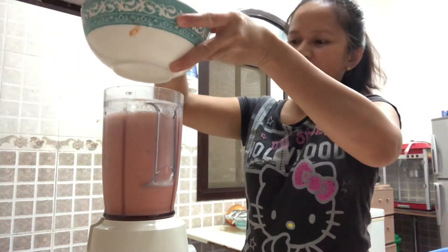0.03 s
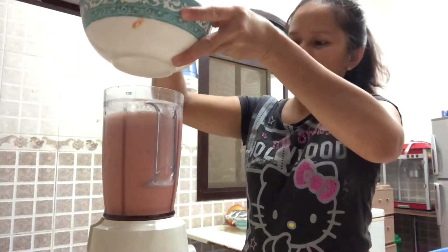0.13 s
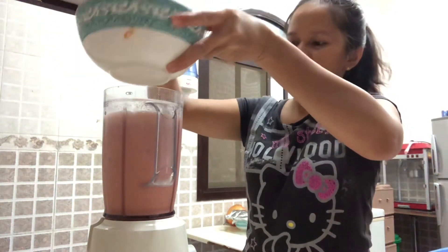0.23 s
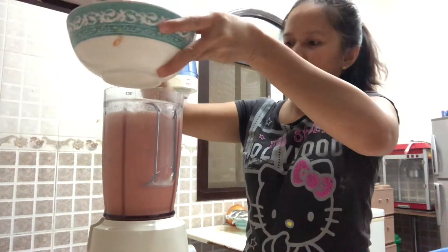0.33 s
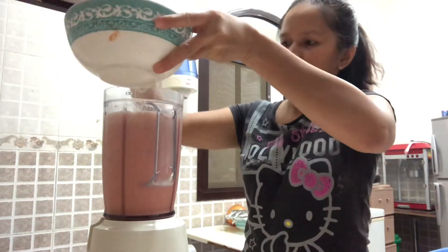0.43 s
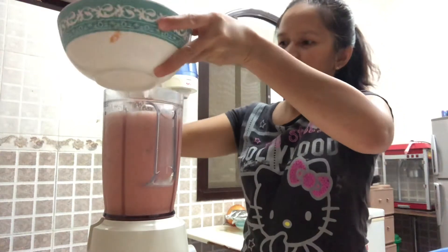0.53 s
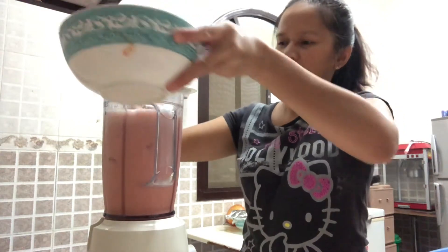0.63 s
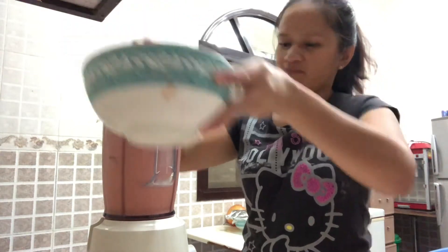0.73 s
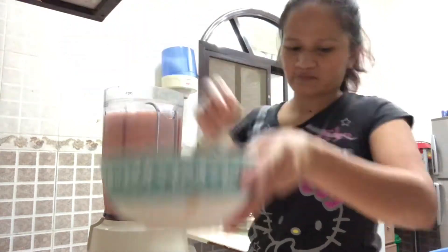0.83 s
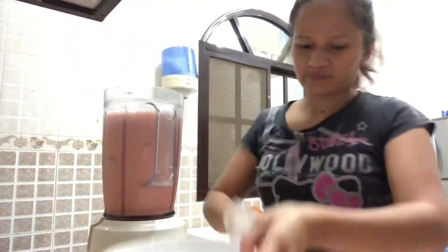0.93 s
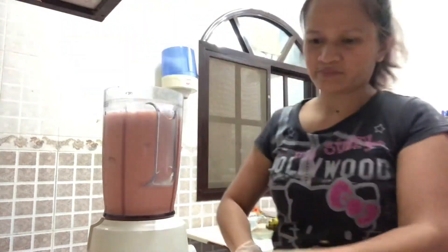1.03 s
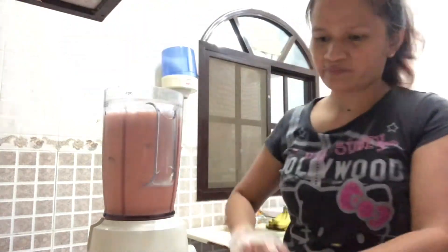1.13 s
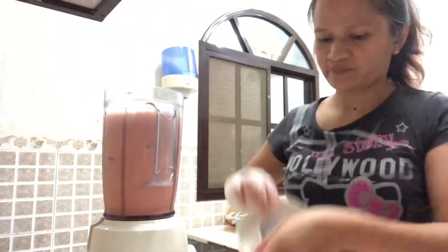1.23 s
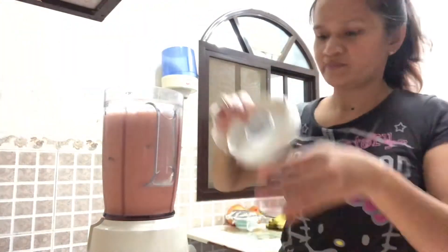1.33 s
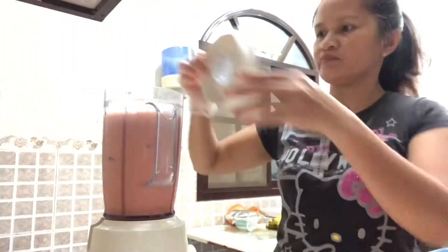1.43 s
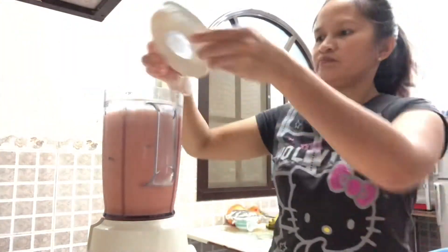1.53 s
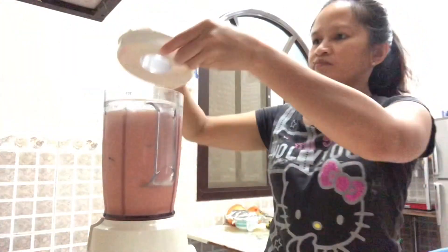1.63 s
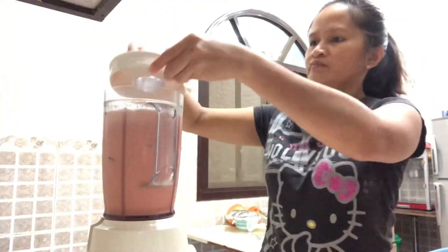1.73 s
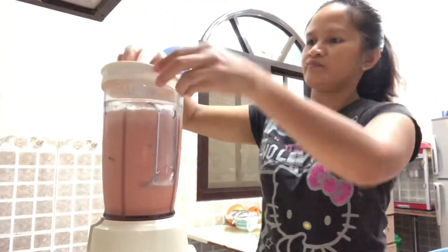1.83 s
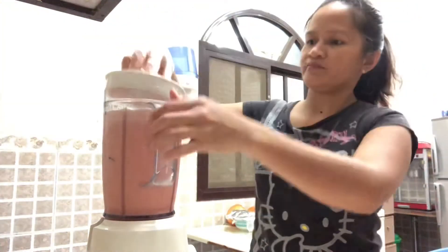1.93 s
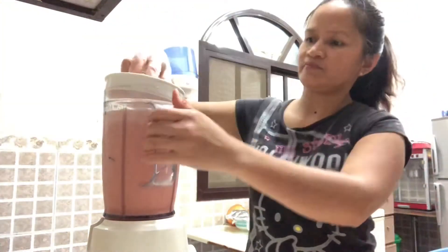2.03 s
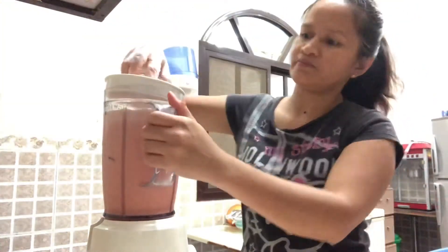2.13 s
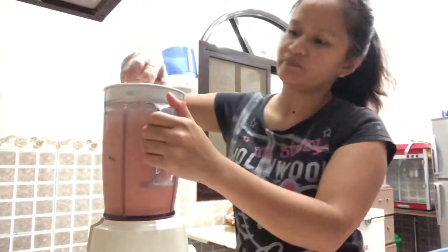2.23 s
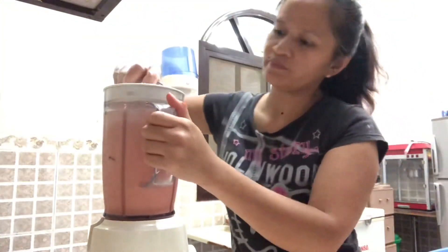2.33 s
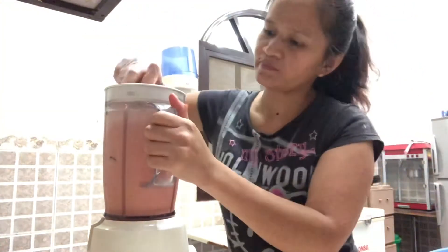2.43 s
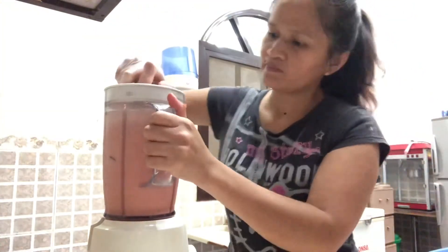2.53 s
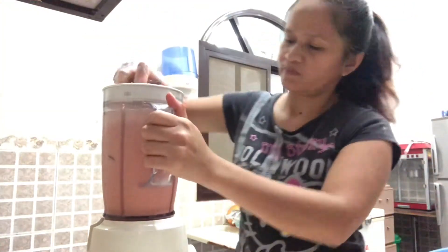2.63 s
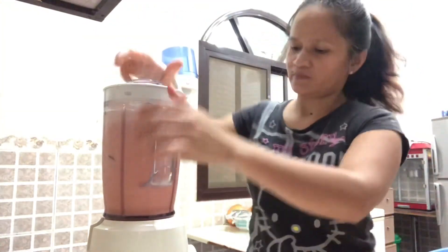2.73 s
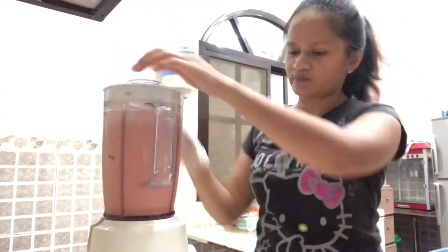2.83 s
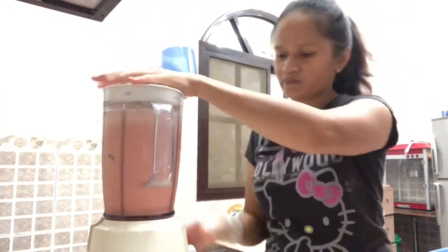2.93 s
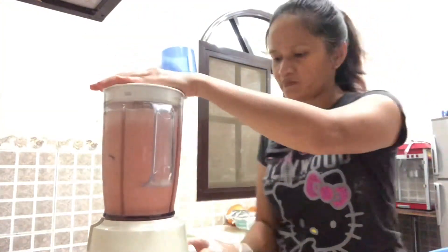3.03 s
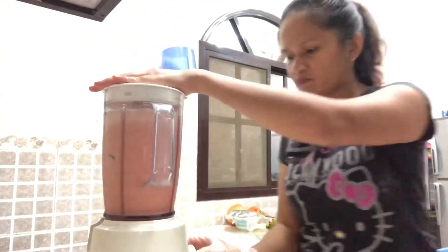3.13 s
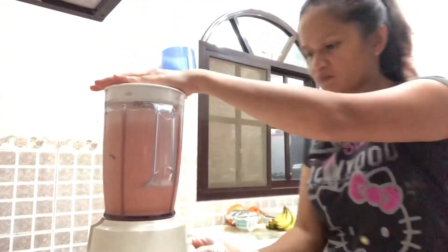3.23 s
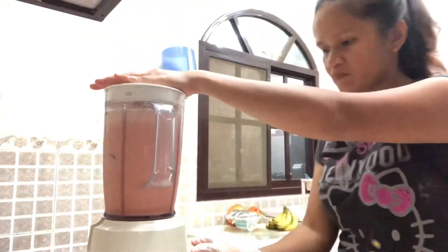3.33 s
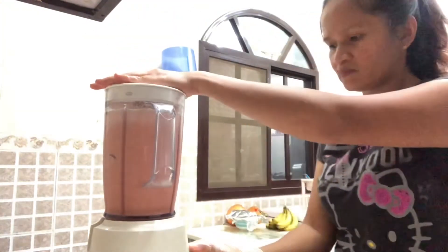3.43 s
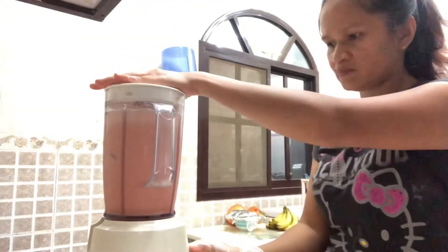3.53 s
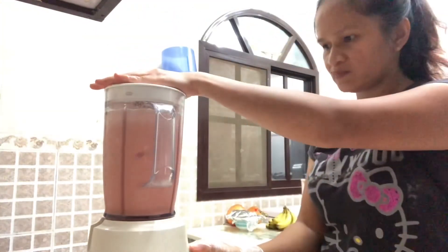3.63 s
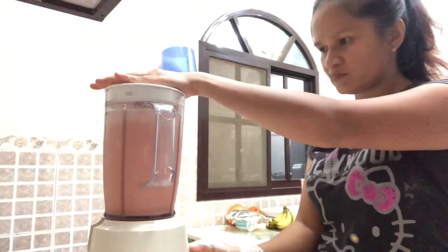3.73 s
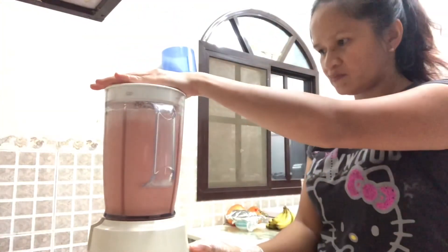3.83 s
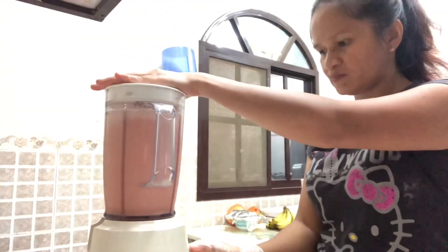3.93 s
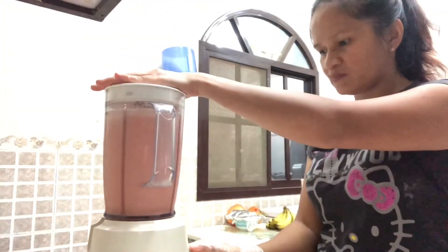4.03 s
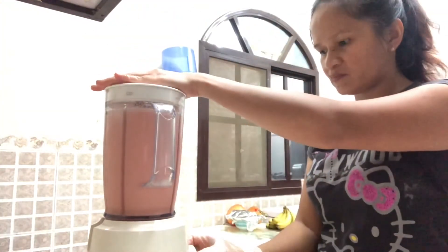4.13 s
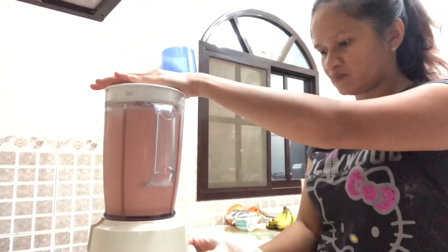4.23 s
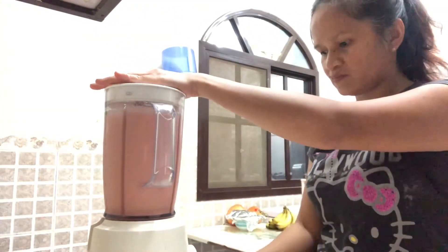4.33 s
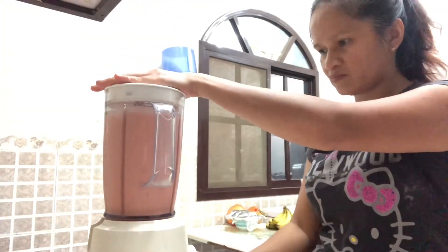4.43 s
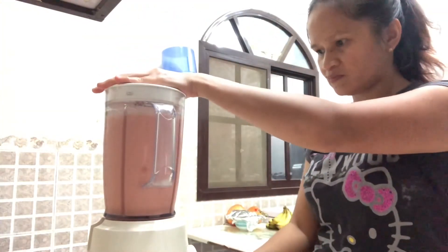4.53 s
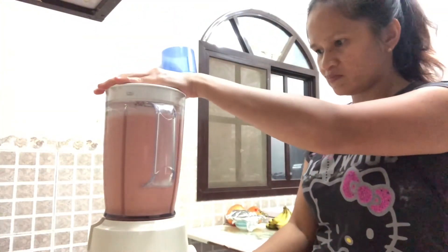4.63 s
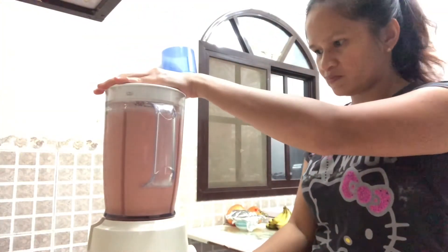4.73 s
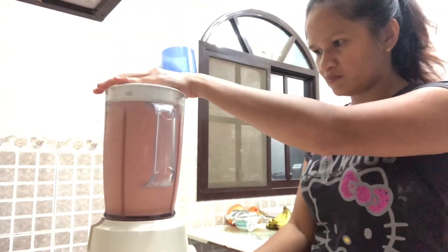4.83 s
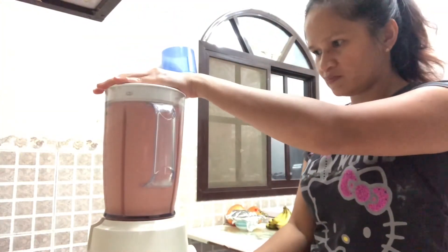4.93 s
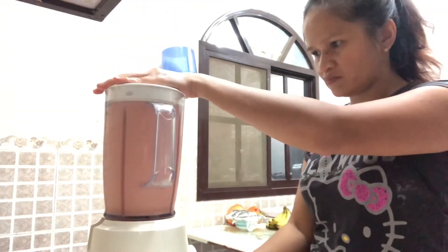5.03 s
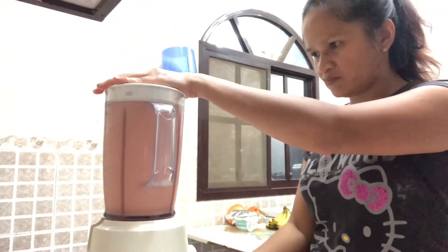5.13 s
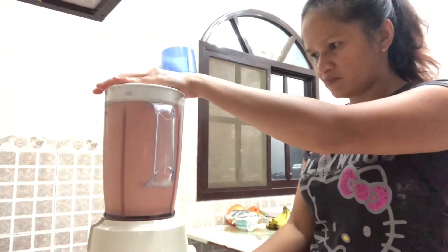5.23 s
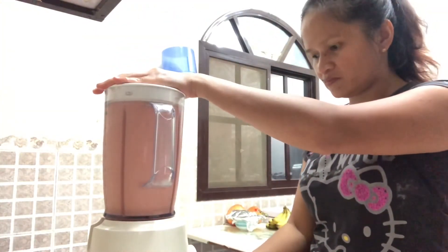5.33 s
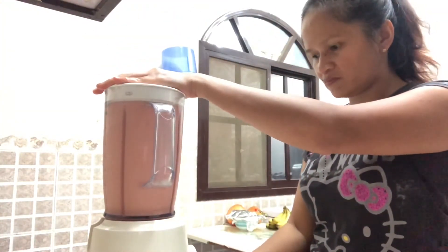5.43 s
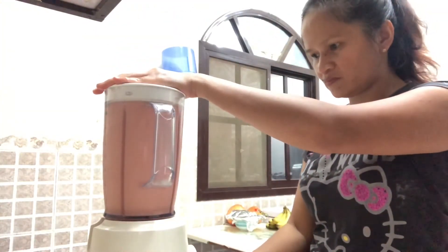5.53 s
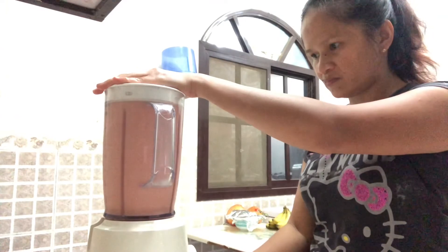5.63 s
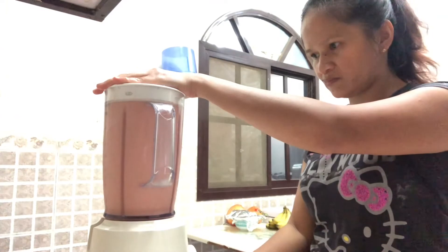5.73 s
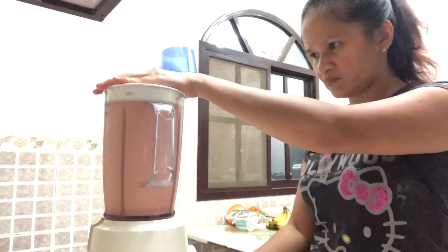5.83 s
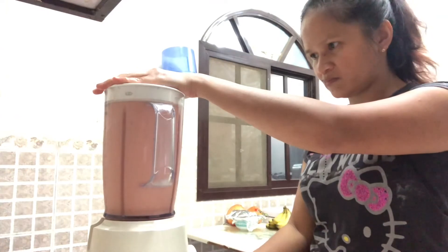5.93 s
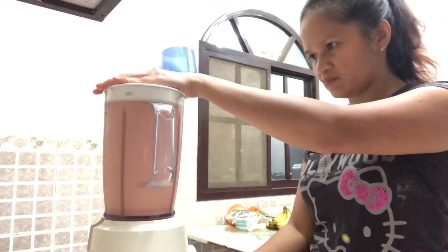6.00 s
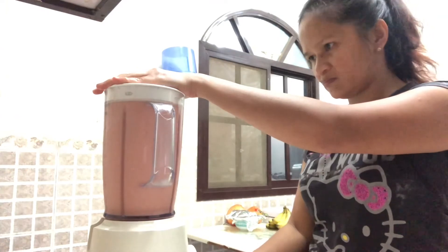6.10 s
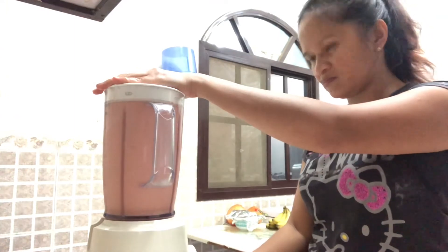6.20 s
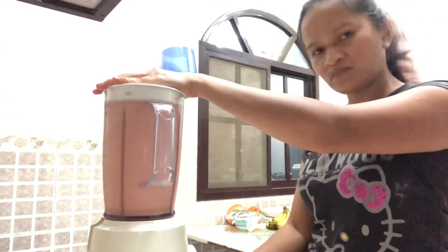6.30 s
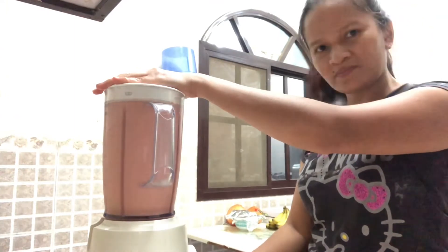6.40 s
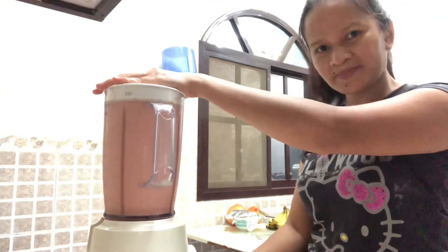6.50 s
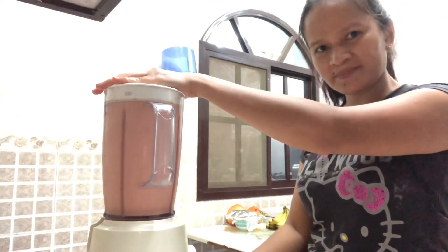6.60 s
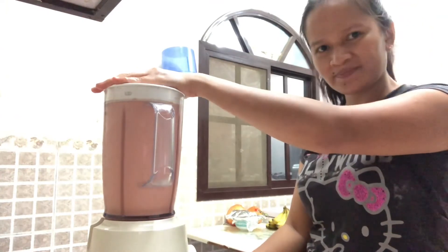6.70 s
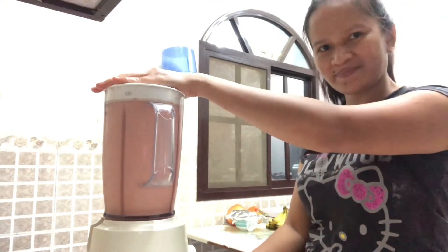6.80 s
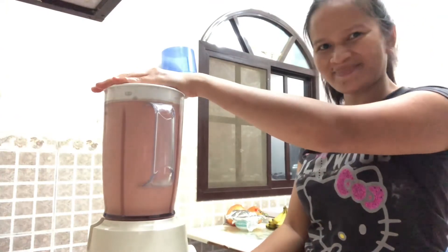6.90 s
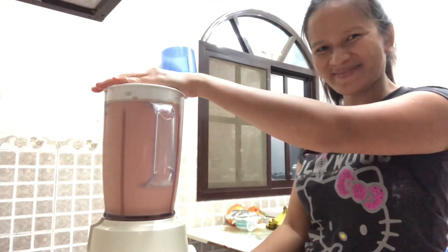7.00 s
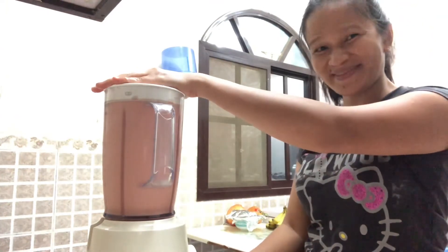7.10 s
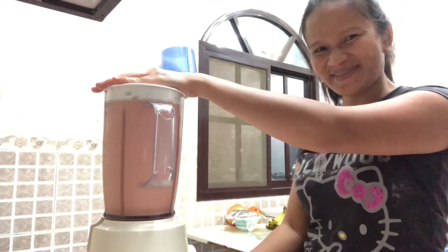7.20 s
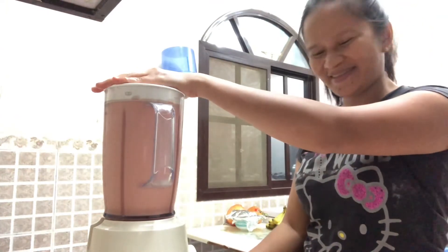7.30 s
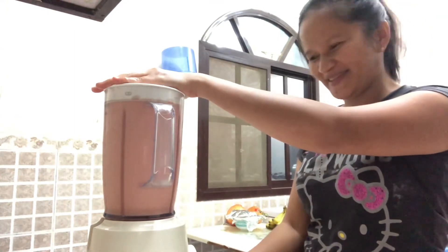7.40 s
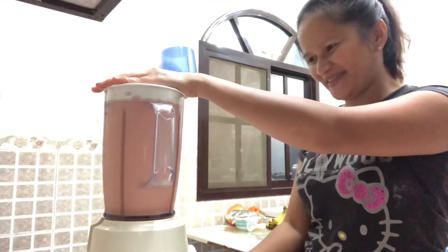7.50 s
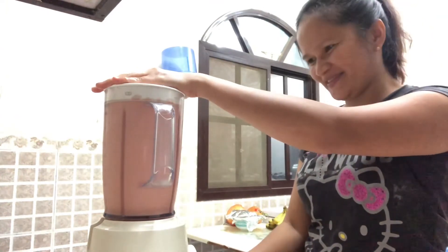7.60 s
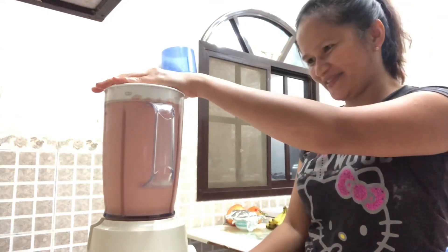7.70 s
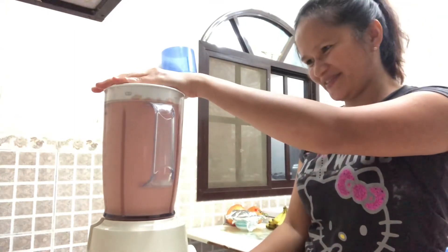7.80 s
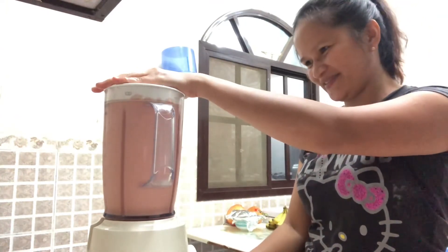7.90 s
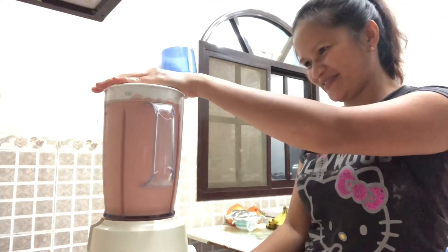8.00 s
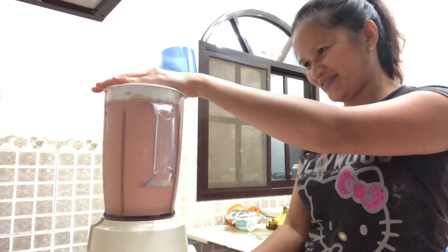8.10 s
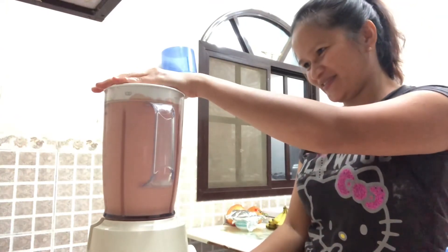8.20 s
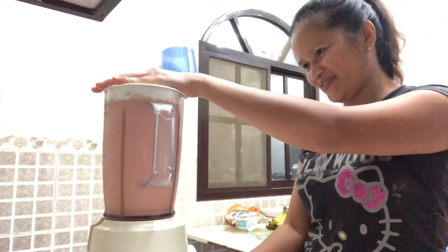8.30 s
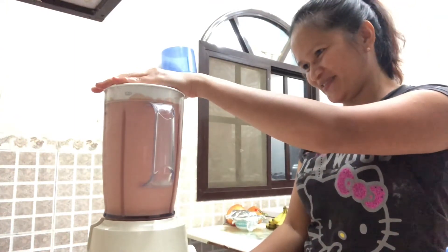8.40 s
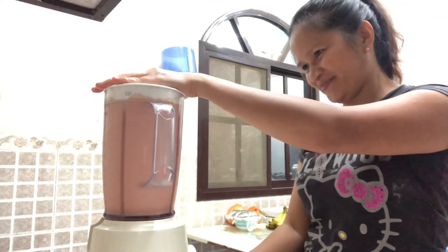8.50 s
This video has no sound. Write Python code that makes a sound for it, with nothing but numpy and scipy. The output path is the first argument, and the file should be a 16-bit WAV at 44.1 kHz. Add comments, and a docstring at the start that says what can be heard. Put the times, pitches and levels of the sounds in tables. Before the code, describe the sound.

Ice slides into a jar, a bowl clatters and a lid snaps on, then a blender starts, pauses and crushes ice with a whine.

```python
"""A blender crushes ice in a tiled kitchen: its shaft radiates a harmonic whine while chips excite the jar.
First the last ice slides from a bowl into the jar, the bowl is put down and the lid snaps shut; each
impact rings the modes of the struck body. The motor starts against wedged ice, coasts and restarts;
as the cubes break up, the load falls and the whine rises through the slush. The scene is in mono,
over the hum of the room."""
import sys
import numpy as np
from scipy import signal
from scipy.fft import rfft, irfft, next_fast_len
from scipy.io import wavfile
from scipy.ndimage import map_coordinates

SR = 44100
rng = np.random.default_rng(int(sys.argv[2]) if len(sys.argv) > 2 else 0)


def bounce(signal):
    """Save signal as a 16-bit WAV file at the path given by the first command-line argument."""
    frames = np.transpose(np.atleast_2d(signal))
    limited = np.clip(frames, -1, 1)
    pcm = np.round(limited * 32767).astype(np.int16)
    wavfile.write(sys.argv[1], SR, pcm)


N = 377231
TIME = np.arange(N) / SR

# Levels and gains in all tables are relative.
# spectra of a contact's sharp click, lighter tick and low thud: frequency_hz, gain_db
CLICK_SPECTRUM = [(1200, -54), (2800, 1), (4000, -1), (5200, 6), (7500, 4), (11000, 2), (16000, -7)]
TICK_SPECTRUM = [(1500, -23), (3500, -1), (5200, -1), (7500, -1), (10000, 1), (12000, -4.5), (16000, -6)]
THUD_SPECTRUM = [(50, -32), (110, -29), (170, -8.5), (270, -21), (390, -5), (480, -6.5), (590, 2),
                 (800, -5.5), (1100, -14), (2500, -44)]
# resonances of the liquid in the jar: centre_hz, half_width_hz, gain_db
LIQUID_MODES = [(152, 26.5, -9.5), (388, 62, -2), (503, 108, -6.5), (608, 87, 3), (828, 50, 6),
                (952, 84, -2)]
# runs of the motor: on_s, wedged_for_s, off_s
MOTOR_RUNS = [(3.355, 0.16, 4.06), (4.419, 0, 9.0)]
TORQUE_HZ = 100  # torque pulses at twice the mains frequency


def amp(db):
    """Amplitude ratio of a level in decibels."""
    return 10 ** (np.asarray(db) / 20)


def unit(x):
    """Normalisation to rms 1."""
    return x / np.sqrt(np.mean(x ** 2) + 1e-20)


def sine(cycles):
    """A sinusoid of a phase given in cycles."""
    return np.sin(2 * np.pi * cycles)


def along(points, hz):
    """Interpolation on a logarithmic frequency axis."""
    knots_hz, values = np.transpose(points)
    return np.interp(np.log(hz + 1), np.log(knots_hz + 1), values)


def wobble(knots_per_s):
    """Smooth random modulation: a spline through Gaussian knots."""
    return map_coordinates(rng.standard_normal(int(N * knots_per_s / SR) + 4), [TIME * knots_per_s])


def shape(points):
    """Magnitude response through points of frequency_hz, gain_db."""
    return lambda hz: amp(along(points, hz))


def body(modes):
    """Magnitude response of a resonator: Lorentzian peaks added in power."""
    return lambda hz: np.sqrt(sum((amp(db) / (1 + ((hz - centre) / width) ** 2)) ** 2
                                  for centre, width, db in modes))


def colour(x, gain, size=8192):
    """Minimum-phase filtering at unit energy, built by folding the cepstrum."""
    cepstrum = irfft(np.log(gain(np.fft.rfftfreq(size, 1 / SR)) + 1e-6))
    cepstrum[1:size // 2] *= 2
    cepstrum[size // 2 + 1:] = 0
    response = irfft(np.exp(rfft(cepstrum)))
    return signal.fftconvolve(x, response / np.linalg.norm(response))[:N]


def kitchen(x, wet_db):
    """Reverberation: the tiles add a diffuse, exponentially decaying tail to the direct sound."""
    # reverberation times: frequency_hz, t60_s
    decay_times = [(150, 0.32), (600, 0.27), (2000, 0.34), (7000, 0.49), (11000, 0.38), (15000, 0.29)]
    hz, t, noise = signal.stft(rng.standard_normal(SR // 2), SR, nperseg=256)
    decay = amp(-60 * t / along(decay_times, hz)[:, None])
    tail = signal.istft(noise * decay, SR, nperseg=256)[1]
    tail = np.pad(tail, (SR // 200, 0))  # 5 ms pre-delay
    return x + amp(wet_db) * signal.fftconvolve(x, tail / np.linalg.norm(tail))[:N]


def impacts(per_s, spread_db):
    """Shot noise: a Poisson train of blows of scattered size, rms 1."""
    struck = rng.random(N) < per_s / SR
    sizes = amp(spread_db * np.minimum(rng.exponential(size=N), 4))
    return unit(struck * sizes * rng.choice([-1, 1], N))


def knocks(contacts, click, modes, thud, gains_db, t60_s):
    """Impact excitation gives a click, a modal ring and a thud; gains_db and t60_s follow that order."""
    t = np.arange(SR // 8) / SR
    force, blows = np.zeros((3, N + len(t))), np.zeros(N)
    fades = amp(-60 * t / np.array(t60_s)[:, None])
    for start_s, *levels_db in contacts:
        start = round(start_s * SR)
        # one hard blow, then a brief chatter of the touching surfaces
        burst = fades * rng.standard_normal(fades.shape)
        burst[:, 0] = 0.38 * np.linalg.norm(burst, axis=1)
        burst *= np.sqrt(np.sum(fades ** 2, axis=1) / np.sum(burst ** 2, axis=1))[:, None]
        force[:, start:start + len(t)] += amp(levels_db)[:, None] * burst
        blows[start] = amp(levels_db[0])
    # the tiles scatter each hard blow into a smooth tail and throw back little of the ring
    scatter = kitchen(blows, wet_db=9.5) - blows
    clicks = colour(force[0, :N] + scatter, shape(click))
    rings = kitchen(colour(force[1], body(modes)), wet_db=-9)
    thuds = kitchen(colour(force[2], shape(thud)), wet_db=-9)
    return amp(gains_db) @ np.array([clicks, rings, thuds])


def room_tone():
    """Background noise: broadband moving air under the unsteady line spectrum of an appliance."""
    # partials of the appliance: pitch_hz, level_db
    partials = [(199.2, -50.5), (226.1, -55), (274.5, -53), (457.6, -50), (549.1, -50.5), (597.5, -50.5),
                (990.5, -59)]
    # spectrum of the air: frequency_hz, gain_db
    air = [(24, -67), (40, -60), (85, -21.5), (163, -16), (189, -3.5), (283, -8), (329, -7), (455, -5),
           (646, -11.5), (790, -9), (1070, -19.5), (1210, -13), (3830, -26), (9220, -36), (16000, -48)]
    hum = sum(amp(db + 2.5 + 2.7 * wobble(5.14)) * np.sin(2 * np.pi * hz * TIME + 0.34 * wobble(17))
              for hz, db in partials)
    return hum + amp(-43) * colour(rng.standard_normal(N), shape(air))


def sliding_ice():
    """Sliding friction: dense micro-impacts scrape over the bowl while small chips tick."""
    # shoves that swell and die away: peak_s, level_db
    shoves = [(0.04, -32.5), (0.07, -33.5), (0.175, -44), (0.5, -44), (0.8, -57)]
    # spectrum of the scrape: frequency_hz, gain_db
    friction = [(40, -21), (90, 2), (250, 2), (500, -8), (1500, -8), (2800, -2), (3400, -2),
                (4200, 3.5), (6000, -11), (16000, -44)]
    swell_db_per_s, fade_db_per_s = 150, 220
    slide_db = np.max([db - np.maximum(swell_db_per_s * (peak_s - TIME), fade_db_per_s * (TIME - peak_s))
                       for peak_s, db in shoves], axis=0)
    scrape = amp(slide_db) * colour(impacts(4000, spread_db=4), shape(friction))
    ticks_db = -45 + 0.49 * (slide_db - slide_db.max())
    ticks = amp(ticks_db) * colour(impacts(70, spread_db=-2), shape(CLICK_SPECTRUM))
    return kitchen(scrape, wet_db=-15) + kitchen(ticks, wet_db=3)


def falling_ice():
    """Free vibration: cubes tipped into the jar ring in their own modes."""
    # landings: start_s, click_db, ring_db, thud_db
    landings = [(0.0233, -13, -28, -37), (0.1664, -16, -25.5, -42), (0.2423, -37, -45, -23.5),
                (0.3035, -22, -41, -46), (0.4294, -16, -50, -45), (0.4603, -13, -47, -44),
                (0.4785, -5.5, -19, -30), (0.5084, -25, -24, -20), (0.523, -21, -24.5, -20.5),
                (0.6355, -24, -26, -15.5), (0.7831, -23, -31, -40), (0.8096, -31, -33, -42),
                (0.8897, -26, -55, -42)]
    # resonances of the cubes: centre_hz, half_width_hz, gain_db
    cube_modes = [(1240, 46, 2.5), (1780, 130, 5), (2170, 180, -1.5), (2920, 510, -4.5), (3970, 170, -21),
                  (4830, 120, -3)]
    return knocks(landings, TICK_SPECTRUM, cube_modes, THUD_SPECTRUM,
                  gains_db=(-13.5, -2.5, -5), t60_s=(0.038, 0.037, 0.048))


def bowl_set_down():
    """Repeated impact: the china bowl lands and rocks, with the counter as a sounding board."""
    # contacts: start_s, click_db, ring_db, thud_db
    contacts = [(1.0206, -1, -14, -25.5), (1.0391, -4, -12.5, -20.5), (1.0484, -11, -16.5, -35),
                (1.0605, -16, -19.5, -35), (1.0989, -21, -24, -30.5)]
    # resonances of the bowl: centre_hz, half_width_hz, gain_db
    china_modes = [(1020, 95, -7.5), (1220, 20, -3), (1610, 120, -11), (1850, 150, -1.5), (1980, 70, -9),
                   (2500, 270, -16), (3100, 100, -16)]
    # thud of the counter: frequency_hz, gain_db
    counter = [(30, -27), (70, -23), (130, 2), (270, -4.5), (400, 1), (900, -5), (1400, -11), (3000, -29)]
    return knocks(contacts, CLICK_SPECTRUM, china_modes, counter,
                  gains_db=(-10.5, 6.5, 1), t60_s=(0.021, 0.035, 0.097))


def lid_seating():
    """Damped vibration: the lid is pressed down and its rim rings briefly over a hollow thud."""
    # contacts: start_s, click_db, ring_db, thud_db
    contacts = [(1.7692, -34, -43, -33), (1.864, -21.5, -40, -27), (1.8769, -25, -33, -27),
                (1.9213, -26.5, -48, -44), (2.1109, -29, -19.5, -16.5), (2.1207, -29, -34, -19),
                (2.1394, -35, -49, -28), (2.1609, -25.5, -45, -37), (2.1724, -29, -53, -41),
                (2.331, -26, -35.5, -34), (2.6249, -31, -49, -47), (2.8913, -27, -42, -48)]
    # resonances of the rim: centre_hz, half_width_hz, gain_db
    rim_modes = [(1210, 120, -8), (2000, 300, -3), (2720, 250, -2), (3300, 280, 0), (3600, 260, -4),
                 (5330, 930, -17)]
    # thud of the lid: frequency_hz, gain_db
    hollow = [(60, -50), (170, -8), (300, -21), (400, -4), (500, 4.5), (600, -5), (800, -12), (1100, -27),
              (2500, -41)]
    return knocks(contacts, TICK_SPECTRUM, rim_modes, hollow,
                  gains_db=(-5.5, 2.5, 0), t60_s=(0.014, 0.018, 0.058))


def plastic_clacks():
    """Impulsive excitation of plastic: the lid snaps home, then the switch is pressed twice."""
    # snaps: start_s, click_db, ring_db, thud_db
    snaps = [(2.4399, -5, -13, -20.5), (3.3534, -15, -10.5, -18.5), (4.419, -11, -15, -22)]
    # resonances of the plastic: centre_hz, half_width_hz, gain_db
    plastic_modes = [(1230, 72, 3), (1710, 160, 8), (2090, 250, -1), (2860, 73, -11), (3400, 600, -4)]
    return knocks(snaps, CLICK_SPECTRUM, plastic_modes, THUD_SPECTRUM,
                  gains_db=(-8.5, 2.5, 3), t60_s=(0.02, 0.032, 0.061))


def motor_drive():
    """Rotational inertia: the share of full speed rises once the blades are free and coasts when off."""
    wedged_share, kick_s, spin_up_s, coast_halving_s = 0.35, 0.007964, 0.035, 0.042
    drive = np.full(N, 1e-4)
    for on, wedged, off in MOTOR_RUNS:
        kick = np.clip((TIME - on) / kick_s, 0, 1)
        spin = 1 - (1 - wedged_share) * np.exp(-np.maximum(TIME - on - wedged, 0) / spin_up_s)
        coast = 1 / (1 + np.maximum(TIME - off, 0) / coast_halving_s)
        drive = np.maximum(drive, kick * spin * coast)
    return drive


def ice_break_up():
    """Fragmentation: the load of whole cubes drops, then the share of coarse ice decays; both 0-1."""
    break_s, width_s, chip_share, grind_s = 4.76, 0.035, 0.5, 1.0
    load = (1 - np.tanh((TIME - break_s) / (2 * width_s))) / 2
    chips = chip_share * np.exp(-np.maximum(TIME - break_s, 0) / grind_s)
    return load, load + (1 - load) * chips


def shaft_turns(drive, load):
    """Phase is the integral of speed, which sags under whole cubes."""
    # unloaded blade-pass rate, wandering in brief surges: time_s, pitch_hz
    blade_pass = [(4.85, 394.6), (4.93, 393.9), (4.96, 410.5), (5.08, 414.6), (5.24, 400.7), (5.55, 390.7),
                  (5.62, 411.0), (5.96, 392.4), (6.01, 405.1), (6.1, 411.6), (6.15, 389.0), (6.21, 389.1),
                  (6.3, 416.3), (6.46, 393.6), (6.72, 391.0), (6.8, 410.0), (6.93, 394.0), (7.13, 394.7),
                  (7.2, 408.9), (7.36, 397.0), (7.5, 396.9), (7.58, 412.2), (7.62, 398.5), (8.19, 390.3),
                  (8.26, 406.8), (8.55, 403.1)]
    blade_count, sag = 2, 0.35
    free_hz = np.interp(TIME, *np.transpose(blade_pass)) / blade_count
    return np.cumsum(free_hz * drive * (1 - sag * load)) / SR


def power_law(drive, coarse, gain_db, exponent, coarse_db):
    """Amplitude grows as a power of the drive; coarse ice shifts the level by up to coarse_db."""
    return amp(gain_db + coarse_db * coarse) * drive ** exponent


def stall_growl(drive):
    """Forced vibration: while the blades are wedged, torque pulses buzz through the liquid's modes."""
    pulses = unit(np.diff(np.floor(TORQUE_HZ * TIME), prepend=0) - TORQUE_HZ / SR)
    powered = sum((TIME > on) & (TIME < off) for on, wedged, off in MOTOR_RUNS)
    return amp(-25.5) * powered * (1 - drive) * colour(pulses, body(LIQUID_MODES))


def whine(turns, drive, load, coarse):
    """Rotor harmonics: a blade-pass tone and higher shaft orders, broadened by phase jitter."""
    # harmonics of the shaft speed: order, level_db
    shaft_orders = [(3, -43), (4, -30.5), (6, -37), (7, -33), (8, -19), (9, -35), (10, -21), (12, -23.5),
                    (16, -33.5), (18, -32.5), (23, -40), (24, -29), (25, -36.5), (34, -34.5), (43, -39)]
    # resonances of the motor housing: centre_hz, half_width_hz, gain_db
    housing_modes = [(1664, 43, -7), (2392, 37, -2), (3320, 49, 3), (4730, 26, 3.5), (4890, 34, -2)]
    shaken = turns + 0.012 * wobble(16) + 0.004 * wobble(45) + 0.002 * wobble(260)
    torque = 1 + 0.073 * sine(TORQUE_HZ * TIME)
    orders = torque * sum(amp(db + 2.8 * wobble(45)) * sine(order * shaken + rng.random())
                          for order, db in shaft_orders)
    # an order swells as it sweeps over a sharp resonance
    housing = amp(-19) * colour(orders, body(housing_modes))
    blades = amp(-24 + 1.8 * wobble(16)) * sine(2 * (shaken + 0.041 * wobble(30)))
    overtones = kitchen(amp(-2) * orders + housing, wet_db=-10)
    gain = power_law(drive, coarse, gain_db=0.68, exponent=2.3, coarse_db=-2.5)
    choke = amp(-11.5 * load)  # whole cubes choke the whine
    return gain * choke * (blades + overtones)


def chip_rattle(turns, drive, coarse, jar_modes):
    """Modulated shot noise: chips hammer the jar and fine spray hisses, in surges tied to the blades."""
    surge = amp(1.2 * sine(2 * turns) + 1.2 * sine(6 * turns) + wobble(130))
    torque = amp(0.9 * sine(TORQUE_HZ * TIME))
    # spectrum of the spray: frequency_hz, gain_db
    spray_spectrum = [(1500, -45.5), (2700, 2.5), (3800, -3.5), (4900, 3), (5400, -1.5), (6100, 2),
                      (7000, -0.5), (7600, -2.5), (8600, 2.5), (9800, -5), (11500, -11), (15800, -14)]
    chips = impacts(2200, spread_db=0.5)
    rattle = colour(torque * surge * (0.62 * chips + 0.79 * rng.standard_normal(N)), body(jar_modes))
    rattle *= power_law(drive, coarse, gain_db=-17, exponent=1.68, coarse_db=4.66)
    spray = colour(surge * (0.5 * chips + 0.73 * rng.standard_normal(N)), shape(spray_spectrum))
    spray *= power_law(drive, coarse, gain_db=-23.5, exponent=1.47, coarse_db=1)
    return rattle + kitchen(spray, wet_db=-9)


def churn(drive, coarse):
    """Random excitation of the churning liquid's low resonances."""
    gain = power_law(drive, coarse, gain_db=-27.5, exponent=1.56, coarse_db=7.9)
    return gain * colour(impacts(2500, spread_db=3), body(LIQUID_MODES))


def cracking(drive, coarse):
    """Brittle fracture: sharp cracks stand out while there are big pieces to split."""
    # spectrum of a crack: frequency_hz, gain_db
    fracture = [(1200, -25), (3000, 2), (6000, 6), (11000, -1), (15500, -5.5), (17000, -22)]
    gain = power_law(drive, coarse, gain_db=-34.5, exponent=1.26, coarse_db=9.9)
    return kitchen(gain * colour(impacts(330, spread_db=4.2), shape(fracture)), wet_db=-9)


def cube_thumps(drive, coarse):
    """Structure-borne sound: whole cubes thump the wall and shake the base."""
    # response of wall and base: frequency_hz, gain_db
    structure = [(20, -14), (70, -21), (160, -14), (250, -1), (360, 5.5), (700, -3), (1100, -5.5),
                 (1280, 9), (1500, 8), (2200, -15.5)]
    gain = power_law(drive, coarse, gain_db=-51.5, exponent=1.7, coarse_db=33.3)
    return gain * colour(impacts(700, spread_db=0.5), shape(structure))


def jar_jolts(jar_modes):
    """Transient response: single cubes jolt the jar as the blades bite or slow down."""
    # jolts: start_s, click_db, ring_db, thud_db
    jolts = [(3.4967, -28, -14, -30), (3.5139, -16, -9, -24), (4.14, -32, -14.5, -27),
             (4.156, -34, -21, -36), (4.4235, 2, -17, -21), (4.4325, -4.5, -12.5, -19)]
    return knocks(jolts, CLICK_SPECTRUM, jar_modes, THUD_SPECTRUM,
                  gains_db=(-10, 1.5, 3.5), t60_s=(0.024, 0.034, 0.048))


def scene():
    """Superposition of all sources; one shaft drives both the whine and the crushing."""
    # resonances of the jar: centre_hz, half_width_hz, gain_db
    jar_modes = [(1245.4, 30.6, -8.5), (1308, 16, -13.5), (1688, 93.6, -1), (1914, 170, -8),
                 (2424, 114, -7.5), (2970, 92, -15.5), (3320, 150, -14), (3647, 120, -16),
                 (4025, 154, -18.5)]
    drive = motor_drive()
    load, coarse = ice_break_up()
    turns = shaft_turns(drive, load)
    motor = stall_growl(drive) + whine(turns, drive, load, coarse)
    crushing = chip_rattle(turns, drive, coarse, jar_modes) + churn(drive, coarse)
    crushing += cracking(drive, coarse) + cube_thumps(drive, coarse)
    no_bass = signal.butter(4, 85, "high", fs=SR, output="sos")  # a small jar radiates no deep bass
    blender = signal.sosfilt(no_bass, motor + crushing) + jar_jolts(jar_modes)
    handling = sliding_ice() + falling_ice() + bowl_set_down() + lid_seating() + plastic_clacks()
    mono = room_tone() + handling + blender
    return np.array([mono, mono])


def record(dry):
    """The level dips briefly near the start; soft saturation rounds the peaks, a low-pass cuts the top."""
    dip_start_s, dip_end_s, dip_fade_s, dip_db = 0.092, 0.11, 0.015, -40
    ceiling, top_hz = 0.85, 15950
    outside_s = np.maximum(dip_start_s - TIME, TIME - dip_end_s)
    dipped = dry * amp(dip_db * np.clip(1 - outside_s / dip_fade_s, 0, 1))
    rounded = dipped / (1 + np.abs(dipped / ceiling) ** 8) ** (1 / 8)
    size = next_fast_len(N + SR // 8)
    passband = np.fft.rfftfreq(size, 1 / SR) < top_hz
    return irfft(rfft(rounded, size) * passband, size)[:, :N]


dry = scene()
out = record(dry)
bounce(out)
```